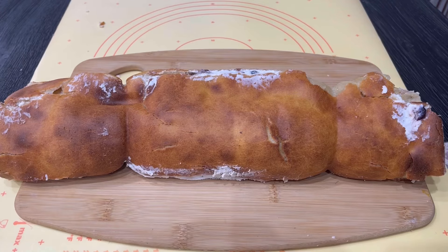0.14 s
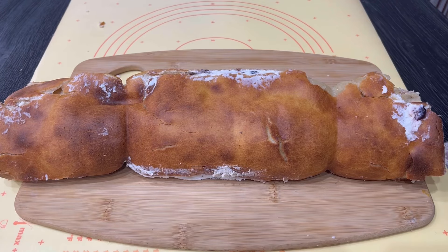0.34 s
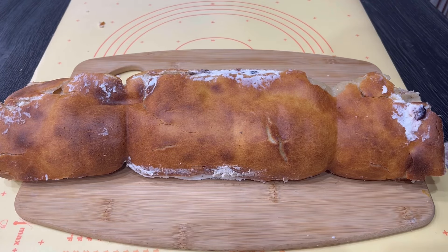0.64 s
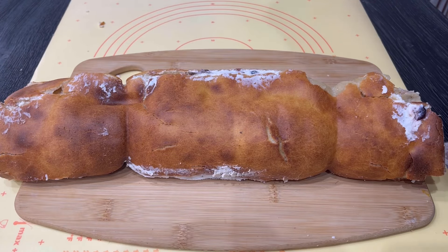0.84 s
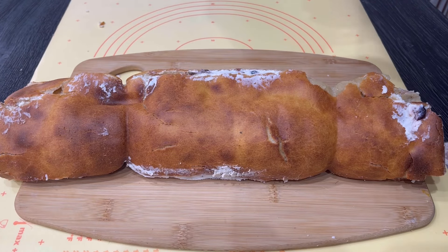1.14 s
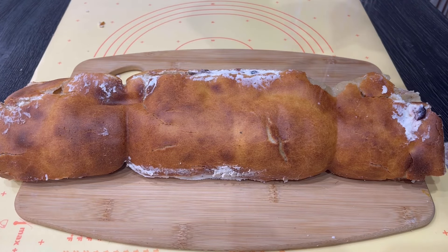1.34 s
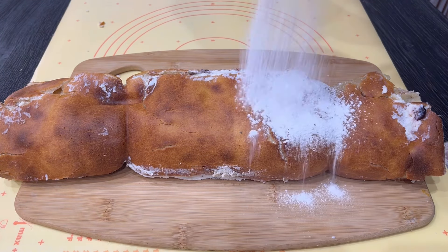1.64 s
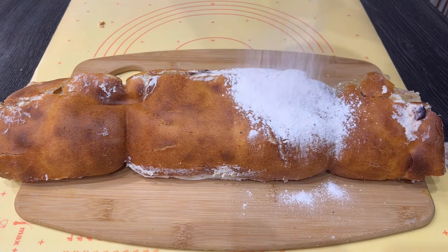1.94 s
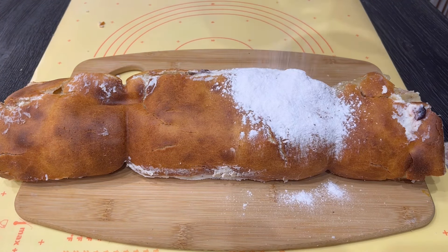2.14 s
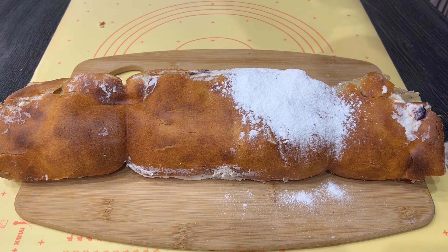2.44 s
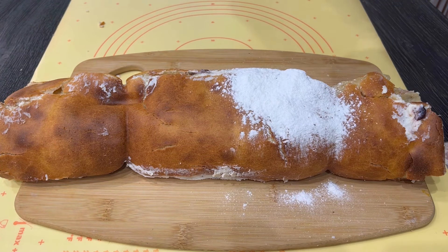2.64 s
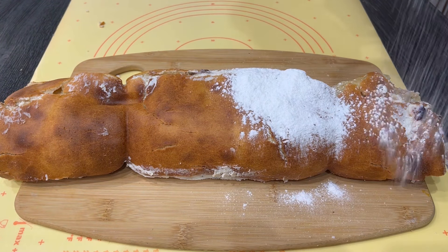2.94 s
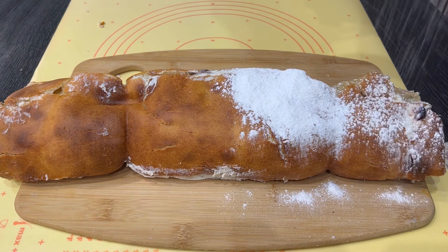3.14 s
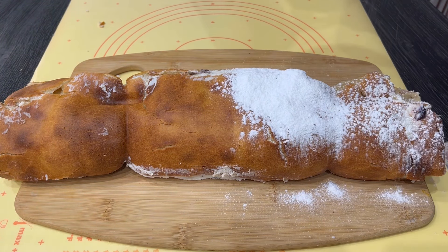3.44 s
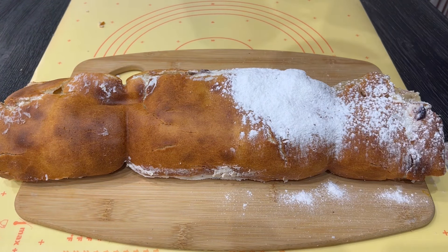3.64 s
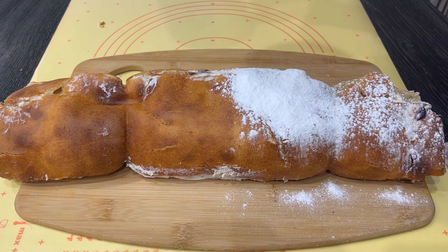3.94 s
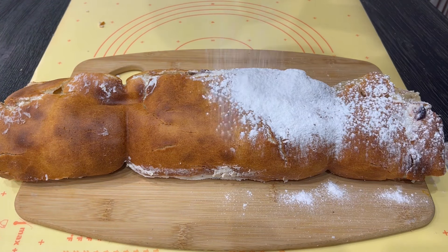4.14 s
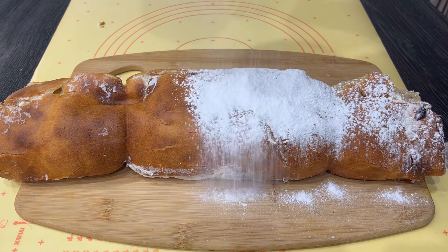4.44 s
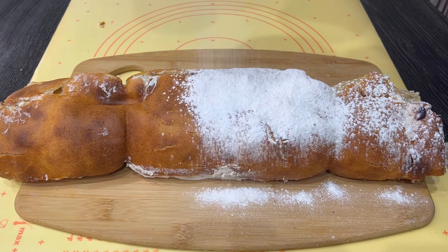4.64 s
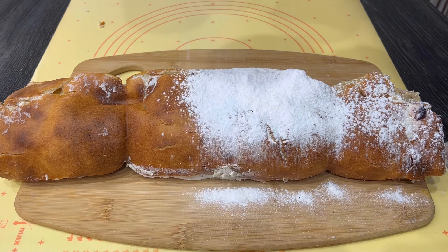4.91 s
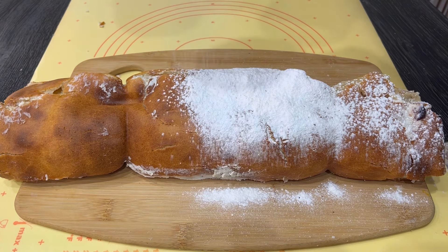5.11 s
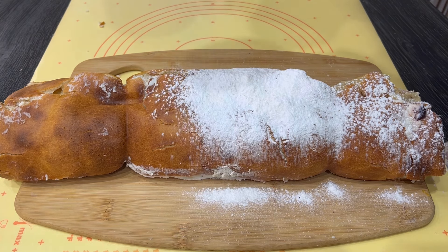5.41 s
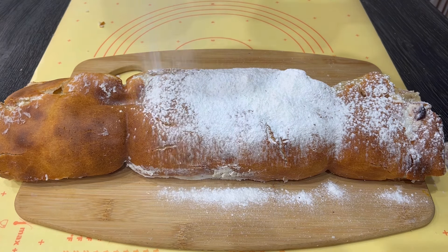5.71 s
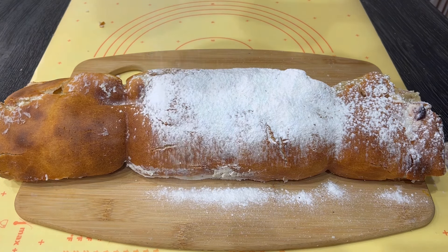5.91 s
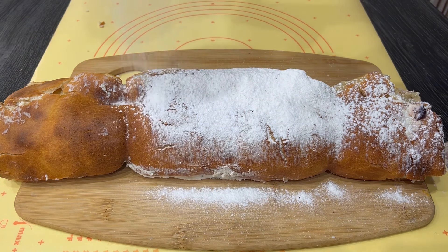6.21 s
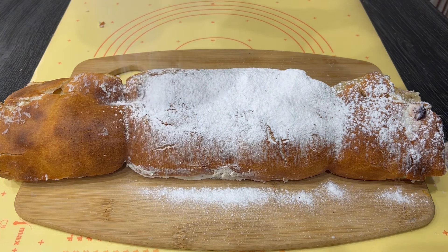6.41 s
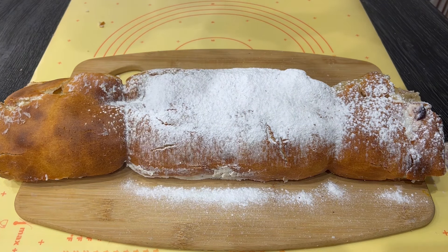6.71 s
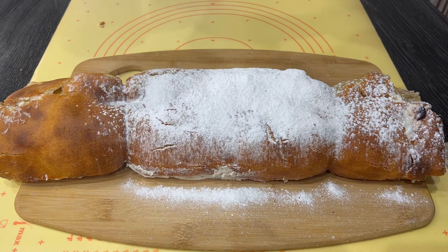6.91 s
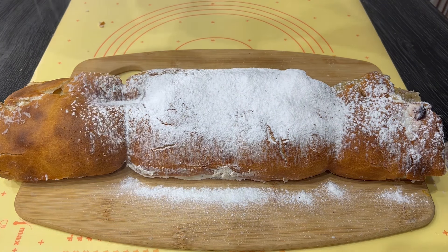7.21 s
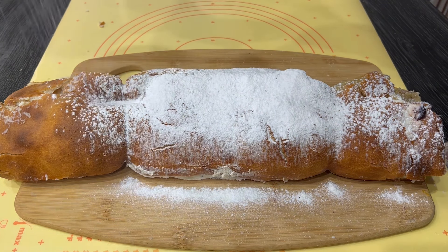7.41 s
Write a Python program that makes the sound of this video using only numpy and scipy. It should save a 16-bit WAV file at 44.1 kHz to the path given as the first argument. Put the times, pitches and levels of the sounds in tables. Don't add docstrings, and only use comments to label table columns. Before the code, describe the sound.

Close stereo microphone in a quiet kitchen with a faint fridge drone. A hand brushes the table and a thin metal sifter ticks faintly. Loose bright taps follow in two small bursts, then a pause. Hard, uneven shaking rattles the can with gritty sugar scrapes, growing strongest around the middle, then lighter, ticking shakes continue to the end.

```python
import sys
import numpy as np
from scipy import signal
from scipy.fft import rfft, irfft, next_fast_len
from scipy.io import wavfile
from scipy.ndimage import uniform_filter1d, map_coordinates

SR = 44100
rng = np.random.default_rng(int(sys.argv[2]) if len(sys.argv) > 2 else 0)


def level_to_linear(level):
    exponent = np.asarray(level, float) / 20
    return 10 ** exponent


def master(y):
    cut = np.clip(np.atleast_2d(y).T, -1, 1)
    pcm = np.round(cut * 32767)
    wavfile.write(sys.argv[1], SR, pcm.astype(np.int16))


N = 333396

# [t/s, push level/dB]
TRICKLE = [
    (6.4, -80),
    (6.6, -78),
    (7.56, -75.5),
]
# [t/s, level over the bare mesh/dB]
HEAP = [
    (1.1, 0),
    (3.6, -3.5),
    (7.5, -15.5),
]
# [f/Hz, width/Hz, level/dB]
LOADED_MESH = [(3620, 300, -3), (3850, 200, 0), (4300, 350, -1)]


def sifter():
    ring, chatter = knocks()
    groups = lambda parts: np.array([sum(parts[:2]), parts[2], sum(parts[3:])])
    trickle = level_to_linear(curves([TRICKLE], [-120]))
    grit = grind(strokes() + chatter + trickle)
    scraped = groups([rings(x, modes) for x, modes in zip(grit, PARTS)])
    heap_db = np.interp(np.arange(N) / SR, *np.transpose(HEAP))
    scraped[1] += level_to_linear(heap_db) * rings(grit[2], LOADED_MESH)
    return groups(ring + notes()) + shifting(scraped, patchy_db=2.6)


# [f/Hz, width/Hz, level/dB]
CUP = [(659, 250, 1), (799, 170, 9.5), (957, 380, -1), (348, 100, -12.5)]
WALL = [(1170, 380, -9.5), (1705, 500, -1), (1944, 393, -4.5), (2170, 121, -17), (2192, 475, -5),
        (3234, 570, -4)]
MESH = [(3800, 450, -12), (4350, 380, -7), (4680, 320, -.5), (5096, 320, -1), (5350, 480, -2)]
RIM = [(6330, 800, -3), (7310, 640, -3), (7815, 450, 1.5), (8606, 190, -4.5), (8930, 315, 4.5),
       (9140, 1700, -3)]
WIRE = [(10240, 240, -8.5), (11100, 210, -11), (11575, 470, -12), (11930, 520, -10), (13430, 720, -7),
        (15020, 240, -3.5)]
PARTS = CUP, WALL, MESH, RIM, WIRE
BLOW_DB = [-2, 0, -1, 2.5, 5]
# [t/s, level over the wall/dB]
GRIP = [(1.3, -13.5), (1.6, -50), (1.68, -10), (1.85, -6), (2.7, -6), (3.9, -11), (4.1, -1), (4.3, -16),
        (4.5, -11.5), (6.3, -4.5), (6.6, -6), (7.1, -3)]


def knocks():
    t = np.arange(SR // 24) / SR
    ring, chatter = np.zeros((2, 5, N + SR))
    chatter_db = np.array([[-12], [-16], [-14], [-21], [-21]])
    fade = (1 - np.exp(-t / 0.0002)) * level_to_linear(chatter_db - 60 * t / 0.05)
    dampings = (1.0, 0.76, 0.59, 1.05, 0.57)
    for s, *parts_db in blows():
        chance = rng.standard_normal((5, 3, 8))
        start = round((s - 0.0009) * SR)
        at = slice(start, start + len(t))
        cup_db = parts_db[0] + np.interp(s, *np.transpose(GRIP)) - 4.5
        gains = level_to_linear(np.array([cup_db, *parts_db])[:, None])
        hits = [struck(modes, t, luck, damping) for modes, luck, damping in zip(PARTS, chance, dampings)]
        ring[:, at] += gains * level_to_linear(np.c_[BLOW_DB]) * hits
        chatter[:, at] += gains * fade
    return ring[:, :N], chatter[:, :N]


# [t/s, peak level of rim/dB, wall/dB, wire/dB]
TAPS = [(1.1342, -42, -57, -62), (1.1394, -53, -68, -73), (1.1585, -44, -53, -60),
        (1.1925, -27.5, -34, -39), (1.2129, -35, -31.5, -36), (1.2727, -46, -54, -48),
        (1.3452, -64, -71, -101), (1.3799, -43, -42, -47), (1.3995, -29.5, -29, -34),
        (1.626, -57, -53, -71.5), (1.6819, -32.5, -33.5, -34), (1.7229, -26.5, -32.5, -24.5),
        (1.7933, -38, -48, -47), (1.8187, -20, -21.5, -33), (1.8536, -23.5, -36, -25)]
# [t/s, peak level of rim/dB, wall/dB, wire/dB]
SLAMS = [(2.6579, -42, -44.5, -77), (2.6833, -39, -41, -50), (2.7619, -28.5, -50, -40),
         (2.8012, -36, -38.5, -82), (2.8116, -29.5, -34.5, -45), (2.9217, -47, -38.5, -60),
         (3.0462, -33.5, -35, -57), (3.1509, -70, -41, -63), (3.2236, -39.5, -63, -56),
         (3.2805, -21.5, -40, -34), (3.4407, -34, -52, -40), (3.4908, -18.5, -31, -23),
         (3.6065, -38.5, -40, -69), (3.7237, -17, -31.5, -24), (3.7306, -43, -34, -38),
         (3.9737, -19, -35.5, -36), (3.979, -18.5, -24.5, -23.5), (4.0942, -22, -36.5, -35),
         (4.1068, -27, -33, -27), (4.1195, -29, -33.5, -30), (4.1374, -32, -31, -32),
         (4.2231, -15, -29, -27), (4.2454, -52, -45, -30), (4.3356, -35, -43, -31),
         (4.4743, -35.5, -35.5, -52), (4.4812, -53, -48, -44), (4.6127, -36.5, -38.5, -46),
         (4.7434, -26.5, -37, -21), (4.8055, -27, -34, -40), (4.9321, -20.5, -35, -13.5)]
# [t/s, peak level of rim/dB, wall/dB]
TOUCHES = [(5.1226, -42, -36), (5.1778, -50, -39.5), (5.2248, -30, -35.5), (5.3621, -30, -34),
           (5.4328, -37, -39), (5.506, -39, -62), (5.613, -32, -38.5), (5.7918, -42, -36),
           (5.8, -23.5, -34), (5.8928, -38.5, -41.5), (5.912, -32, -38), (6.0405, -34, -42),
           (6.045, -42, -55), (6.112, -27, -32.5), (6.1952, -33, -68), (6.2395, -37, -34.5),
           (6.469, -38, -34), (6.5538, -46, -43), (6.567, -41, -45), (6.6862, -24, -29.5),
           (6.754, -48, -46), (6.7644, -41.5, -40.5), (6.905, -72, -40), (6.9854, -34, -35.5),
           (7.0376, -43.5, -44), (7.0964, -32, -30), (7.1767, -40, -43), (7.29, -26.5, -29.5),
           (7.395, -36.5, -39.5)]
# [t/s, peak level of mesh/dB, rim and wire/dB]
CATCHES = [(3.0016, -53, -33), (3.349, -49, -48), (3.4353, -37, -39.5), (3.554, -38, -47),
           (3.5606, -51, -46), (3.6805, -40, -31.5), (3.9408, -38.5, -48), (3.945, -31, -38),
           (4.18, -40, -49), (4.219, -33.5, -30), (4.4383, -49, -37), (4.4473, -32.5, -39.5),
           (4.6792, -34, -45), (4.6864, -37.5, -40), (4.696, -30.5, -40), (4.887, -31, -34.5),
           (4.8917, -33, -32), (4.9754, -33, -42)]
# [t/s, peak level of mesh/dB, rim and wire/dB]
SNAGS = [(5.075, -34, -38), (5.0842, -35, -35.5), (5.3193, -36, -40), (5.571, -47, -45),
         (5.641, -40.5, -50), (5.851, -37, -46.5), (5.986, -45, -40), (5.993, -40, -49), (6.187, -46, -37),
         (6.379, -44, -64), (6.508, -38, -49), (6.6337, -33.5, -44), (6.671, -32, -46), (6.828, -38, -43),
         (7.0881, -38, -60), (7.126, -34, -41), (7.241, -41, -44), (7.342, -36.5, -55), (7.488, -41, -47),
         (7.498, -40.5, -64)]
# [t/s, peak level of mesh/dB, rim and wire/dB]
GRAZES = [(1.228, -54, -33.5), (1.814, -50, -32.5), (2.967, -52, -69), (3.212, -54, -52), (4.128, -42, -34),
          (5.735, -42.5, -61), (6.175, -45, -48), (7.267, -37, -60), (7.53, -47, -61)]
# [t/s, peak level of wall/dB, mesh/dB, rim/dB, wire/dB]
LIFT = (0.1405, -52, -45, -56, -58)


def blows():
    slam = [(s, wall, -46.5 + 0.26 * (wire + 45), rim, wire) for s, rim, wall, wire in TAPS + SLAMS]
    touch = [(s, wall, wall - 4.5, rim, rim - 6.5) for s, rim, wall in TOUCHES]
    catch = lambda rows: [(s, mesh - 15, mesh, top + 5, top + 3.5) for s, mesh, top in rows]
    return sorted(slam + touch + catch(CATCHES + SNAGS)) + [LIFT] + catch(GRAZES)


def struck(modes, t, chance, damping):
    hz, width, db = np.transpose(modes)[:, :, None]
    size, shift, phase = chance[:, :len(modes), None]
    size_db = db + 2.8 * size - 10 * (hz > 14500)
    since = np.maximum(t - 0.0008 * abs(phase), 0)
    pitch = hz * (1 + 0.012 * shift)
    wave = level_to_linear(size_db) * np.exp(2j * np.pi * (pitch * t + phase) - np.pi * width * damping * since)
    rise_s = 0.00051 + 0.38 / hz
    wave = (wave * np.sin(np.pi / 2 * np.minimum(since / rise_s, 1)) ** 2).sum(0)
    return wave.real / abs(wave).max()


# [t/s, peak level/dB, f/Hz]
CUP_NOTES = [(0.136, -40, 620), (1.138, -44.5, 918), (1.274, -38, 810), (1.399, -29, 890),
             (1.426, -41, 910), (1.695, -34.5, 880), (1.721, -27.5, 830), (1.817, -33, 855),
             (1.844, -38, 770), (1.869, -42, 740), (2.682, -41.5, 860), (2.956, -46, 1130),
             (3.49, -41, 1020), (3.731, -37.5, 930), (3.834, -44.5, 1154), (3.974, -35, 1160),
             (4.094, -36, 900), (4.119, -41, 770), (4.136, -33, 884), (4.222, -52, 830), (4.316, -43, 850),
             (5.433, -45, 830), (6.113, -43, 1027), (6.669, -44, 740), (6.685, -48, 820), (6.755, -38, 970),
             (7.041, -40, 744), (7.084, -41, 744), (7.093, -40, 1005), (7.29, -36.5, 770),
             (7.547, -45, 1030)]
WALL_NOTES = [(1.1338, -41, 2260), (1.193, -39, 1570), (1.2127, -37, 1810), (1.378, -42.5, 2920),
              (1.3992, -24, 2050), (1.667, -52, 2930), (1.68, -32, 1730), (1.7224, -24.5, 1614),
              (1.8179, -25.5, 1830), (2.659, -42, 2600), (2.6842, -33, 2260), (2.7623, -37.5, 2900),
              (2.7995, -34, 2230), (2.9202, -36, 3080), (3.002, -42, 3050), (3.0453, -50, 1950),
              (3.151, -39.5, 3050), (3.2799, -38, 2530), (3.44, -35.5, 2580), (3.4919, -34, 3220),
              (3.606, -37.5, 1650), (3.6808, -38, 2490), (3.9739, -28.5, 1660), (4.095, -33.5, 1600),
              (4.1393, -37, 1780), (4.2214, -26.5, 1530), (4.4376, -40.5, 2180), (4.4724, -34, 1680),
              (4.687, -41, 3150), (4.7274, -38, 1680), (4.743, -30, 2290), (4.8057, -41, 1860),
              (4.8886, -40, 3140), (4.933, -29, 2350), (5.123, -41, 1590), (5.178, -41, 3320),
              (5.224, -36, 1690), (5.362, -34, 1700), (5.611, -42, 1990), (5.64, -40, 2300),
              (5.8008, -45, 1940), (5.8917, -44, 1740), (5.9105, -41, 2280), (6.0389, -31.5, 1820),
              (6.1148, -33, 1770), (6.2386, -36, 1670), (6.4706, -43, 1940), (6.508, -41, 3180),
              (6.6687, -45, 2080), (6.6867, -46, 1570), (6.753, -40, 1810), (6.904, -39, 1810),
              (7.0946, -36.5, 1830), (7.24, -46, 2960), (7.2919, -33.5, 1810)]
MESH_NOTES = [(1.1921, -45, 6960), (1.3977, -37, 3840), (1.8167, -37, 3850), (2.6594, -41, 5430),
              (2.9202, -40, 3580), (3.002, -33, 5300), (3.2814, -33, 4960), (3.436, -42, 4240),
              (3.4914, -35, 6340), (3.677, -30, 4740), (3.9449, -31, 5050), (3.9743, -31, 6250),
              (4.096, -34, 4900), (4.205, -40, 5270), (4.439, -28, 4610), (4.6877, -45, 4580),
              (4.745, -26, 5280), (4.8049, -36, 6140), (4.8828, -28, 4800), (4.9335, -24, 5300),
              (5.0735, -39, 4740), (5.224, -34, 6400), (5.3195, -35, 5210), (5.362, -28.5, 6330),
              (5.6125, -28.5, 6400), (5.9857, -35, 4570), (6.1116, -35, 4570), (6.1868, -29.5, 4700),
              (6.3764, -48, 4700), (6.47, -33.5, 6330), (6.5547, -48, 4670), (6.7545, -37, 6460),
              (6.8278, -46, 5230), (6.9845, -39, 6750), (7.0372, -37, 5370), (7.0947, -26.5, 6530),
              (7.1246, -28, 5630), (7.2374, -30.5, 5120), (7.2903, -23, 6450), (7.3411, -34, 5230),
              (7.4894, -28, 5280)]
# [rise/s], [t60/s], [level/dB]
NOTE_RISE_S = (0.0016, 0.00079, 0.00015)
NOTE_T60_S = (0.038, 0.015, 0.022)
NOTE_DB = (-2.5, 1.5, -2.5)


def notes():
    out = np.zeros((5, N + SR))
    t = np.arange(SR // 12) / SR
    for k, rows in enumerate((CUP_NOTES, WALL_NOTES, MESH_NOTES)):
        rise = np.sin(np.pi / 2 * np.minimum(t / NOTE_RISE_S[k], 1)) ** 2
        shape = rise * level_to_linear(NOTE_DB[k] - 60 * t / NOTE_T60_S[k])
        for s, db, hz in rows:
            out[k, round(s * SR):][:len(t)] += level_to_linear(db) * shape * np.sin(2 * np.pi * hz * t)
    return out[:, :N]


# [t/s, length/s, push level on wall/dB, on mesh/dB]
STROKES = [(0.096, 0.044, -65, -67), (0.67, 0.072, -75, -72.5), (1.118, 0.054, -59.5, -73.5),
           (1.194, 0.075, -51.5, -58.5), (1.387, 0.042, -45.5, -53), (1.656, 0.066, -48, -57),
           (1.802, 0.046, -51, -49), (2.666, 0.022, -51, -51.5), (2.784, 0.023, -53, -50),
           (2.909, 0.047, -63.5, -69.5), (2.992, 0.059, -60, -61), (3.134, 0.013, -61, -57.5),
           (3.202, 0.034, -58.5, -56.5), (3.271, 0.015, -52, -50.5), (3.336, 0.0096, -47.5, -49.5),
           (3.43, 0.043, -59.5, -49.5), (3.48, 0.011, -58, -47), (3.542, 0.013, -51, -53),
           (3.674, 0.014, -50, -41), (3.715, 0.047, -84, -59.5), (3.773, 0.094, -57, -61),
           (3.952, 0.032, -47.5, -44.5), (4.084, 0.045, -52, -54), (4.203, 0.021, -41, -45),
           (4.293, 0.051, -57.5, -70), (4.419, 0.055, -59, -50.5), (4.565, 0.014, -53, -56),
           (4.686, 0.033, -55.5, -54), (4.722, 0.04, -51.5, -43.5), (4.877, 0.0053, -50, -30)]
# [t/s, length/s, push level on wall/dB, on mesh/dB]
SWINGS = [(4.908, 0.065, -54, -48.5), (5.066, 0.12, -59.5, -58), (5.215, 0.046, -60, -60.5),
          (5.333, 0.054, -52, -48.5), (5.477, 0.0077, -53, -63), (5.535, 0.096, -59.5, -52),
          (5.767, 0.059, -53.5, -49.5), (5.884, 0.029, -63.5, -68), (5.973, 0.04, -63.5, -52),
          (6.018, 0.033, -55, -52), (6.089, 0.011, -54, -62), (6.166, 0.071, -56, -50),
          (6.421, 0.083, -74, -59), (6.534, 0.025, -65.5, -76), (6.646, 0.025, -51, -45),
          (6.747, 0.014, -57, -66), (6.819, 0.083, -99, -60), (6.856, 0.024, -58.5, -56),
          (6.943, 0.038, -63, -70), (7.058, 0.025, -52.5, -43), (7.231, 0.0091, -61, -40),
          (7.268, 0.021, -47.5, -44), (7.357, 0.028, -58.5, -66.5), (7.485, 0.047, -61.5, -50.5)]


def strokes():
    push = np.zeros((5, N + SR))
    t = np.arange(SR // 4) / SR
    slide = (1 - np.exp(-t / 0.006)) ** 2
    for s, length, wall, mesh in STROKES + SWINGS:
        shape = slide * level_to_linear(-3 * t / length - 138 * np.maximum(t - length, 0))
        cup = wall + np.interp(s, *np.transpose(GRIP)) + 0.98 * (wall - mesh)
        rim = wall + 0.35 * (mesh - wall) + 4.5
        wire = rim - 1.5
        parts_db = np.array([cup, wall, mesh, rim, wire])[:, None]
        push[:, round(s * SR):][:, :len(t)] += level_to_linear(parts_db) * shape
    return push[:, :N]


def grind(push):
    crushed = rng.random(N) < 1400 / SR
    crystals = crushed * level_to_linear(2.8 * np.minimum(rng.exponential(size=N), 4))
    grit = unit(crystals) * 0.55 + 1
    clumps = level_to_linear(1.5 * wobble(60) + 2.5 * wobble(220))
    own = level_to_linear(2.2 * np.array([wobble(110) for _ in PARTS]))
    return push * unit(grit * clumps * own) * rng.standard_normal(push.shape)


def shifting(x, patchy_db):
    z = signal.stft(x, nperseg=256)[2]
    field = uniform_filter1d(rng.standard_normal(z.shape), size=2, axis=1)
    field = unit(uniform_filter1d(field, size=9, axis=2))
    patches = level_to_linear(patchy_db * field - 0.22 * patchy_db ** 2)
    return signal.istft(z * patches, nperseg=256)[1][:, :N]


# [t/s, thud level/dB, swish level/dB]
HAND = [
    [(0, -81, -71), (.1, -66, -66.5), (.14, -56.5, -51), (.175, -74, -55), (.25, -61, -53), (.33, -58, -67),
     (.44, -65, -87)],
    [(.44, -71, -97), (.49, -64, -62), (.62, -61, -71.5), (.73, -63, -62), (.92, -65, -72.5),
     (.96, -56.5, -59.5), (1.12, -77, -67.5)],
    [(1.12, -67.5, -78), (1.4, -69.5, -94), (1.8, -71.5, -90), (2.05, -77, -100)],
    [(2.66, -69.5, -92), (3.5, -73.5, -83), (4.2, -74.5, -80), (5, -69, -71), (5.8, -73.5, -88),
     (6.3, -75, -73), (6.6, -62, -70), (6.85, -60, -64), (7.56, -60.5, -69)],
]
# [f/Hz, level per Hz/dB]
THUD = [(24, -34.5), (40, -7), (195, -1), (329, -1.5), (395, -7.5), (600, -15.5), (780, -36), (1320, -120)]
SWISH = [(240, -38.5), (400, -6), (626, -5), (839, -8), (2300, -18.5), (5350, -29.5), (5960, -38),
         (7510, -31), (16000, -58)]


def hand():
    thud_db, swish_db = curves(HAND, [-120, -120])
    thud_db += 1.8 * wobble(25)
    swish_db += 2 * wobble(70)
    thud = level_to_linear(thud_db) * rush(THUD, [(100, 0.97), (600, 0.76)])
    swish = level_to_linear(swish_db) * rush(SWISH, [(500, 0.072), (8000, 0.35)])
    return thud + swish


# [f/Hz, t60/s]
KITCHEN = [(300, 0.44), (2000, 0.26), (9000, 0.13), (16000, 0.037)]


def kitchen(x):
    step = SR // 10
    pieces = np.pad(x, (90, -(N + 90) % step)).reshape(-1, 1, step)
    hz, t, z = signal.stft(rng.standard_normal((len(pieces), 2, SR // 3)), SR, nperseg=256)
    decay = level_to_linear(-60 * t / along(KITCHEN, hz)[:, None])
    tail = signal.istft(z * decay, SR, nperseg=256)[1]
    tail = tail / np.linalg.norm(tail[0, 0])
    out = np.zeros((2, N + SR))
    for k, wash in enumerate(signal.fftconvolve(pieces, tail, axes=2)):
        out[:, k * step:][:, :wash.shape[1]] += wash
    return out[:, :N]


# [f/Hz, level per Hz/dB]
AIR = [(24, -7), (40, -14), (70, -15.5), (172, -18.5), (231, -11), (255, -28.5), (325, -21), (820, -33),
       (1970, -20), (3210, -25.5), (3540, -20), (4150, -25.5), (4600, -23), (12000, -42.5), (13500, -36),
       (15000, -58)]
# [f/Hz, likeness]
ALIKE = [(60, 0.92), (180, 1), (550, 0.39), (1650, 0.019), (5000, 0.31), (8000, 0.31)]
# [f/Hz, width/Hz, level/dB]
HUM = [(64.7, 3.1, 9), (192.6, 6.6, 2.5), (225, 11, 0.5), (326.6, 23, 0.5), (3800, 30, -9)]


def room_tone():
    drift_db = 0.7 * wobble(3)
    air = level_to_linear(-66 + drift_db) * rush(AIR, ALIKE)
    fridge = level_to_linear(-75) * rings(rng.standard_normal(N), HUM)
    return air + fridge


def unit(x):
    return x / np.sqrt(np.mean(x ** 2) + 1e-20)


def along(points, hz):
    f, v = np.transpose(points)
    return np.interp(np.log(hz + 1), np.log(f + 1), v)


def curves(spans, silent):
    out = np.tile(np.reshape(silent, (-1, 1)), N) * 1.0
    for rows in spans:
        s, *cols = np.transpose(rows)
        k = np.arange(max(round(s[0] * SR), 0), min(round(s[-1] * SR), N))
        out[:, k] = [np.interp(k / SR, s, c) for c in cols]
    return out


def wobble(rate):
    knots = rng.standard_normal(int(N * rate / SR) + 4)
    return map_coordinates(knots, [np.arange(N) * rate / SR])


def filtered(x, response):
    m = next_fast_len(N + SR // 2)
    return irfft(rfft(x, m) * response(np.fft.rfftfreq(m, 1 / SR)), m)[..., :N]


def rings(x, modes):
    def gain(f):
        total = 0
        for k, (c, w, db) in enumerate(modes):
            total = total + (-1) ** k * level_to_linear(db / 2) * 1j * f * w / (c * c - f * f + 1j * f * w)
        return total ** 2
    power = np.mean(abs(gain(np.linspace(0, SR / 2, 4096))) ** 2)
    return filtered(x, gain) / np.sqrt(power)


def pair(x, alike):
    turn = lambda hz: np.arccos(np.clip(along(alike, hz), -1, 1)) / 2
    mid, side = filtered(x, lambda hz: np.array([np.cos(turn(hz)), np.sin(turn(hz))]))
    return np.array([mid + side, mid - side])


def rush(spectrum, alike):
    noise = filtered(rng.standard_normal((2, N)), lambda hz: level_to_linear(along(spectrum, hz)))
    return unit(pair(noise, alike))


SIDES = np.array([[0.5], [-0.5]])
# [t/s, left minus right level/dB]
PLACE = [
    (1.1, 7.5),
    (3.8, 8.5),
    (5.5, 12.5),
    (7.56, 15),
]
LEAN_DB = [-7, -6]
# [f/Hz, likeness]
DIFFUSE = [(600, 0.25), (6000, 0.031), (8000, 0.32)]


def scene():
    body, mesh, treble = sifter()
    pan_db = np.interp(np.arange(N) / SR, *np.transpose(PLACE))
    body_pan = level_to_linear(SIDES * (pan_db + LEAN_DB[0]))
    mesh_pan = level_to_linear(SIDES * (pan_db + LEAN_DB[1]))
    direct = treble + body * body_pan + mesh * mesh_pan
    wash = level_to_linear(-7.5) * pair(kitchen(body + mesh + treble), DIFFUSE)
    return direct + wash + hand() + room_tone()


def low_pass(x):
    return signal.sosfilt(signal.butter(12, 17140, fs=SR, output="sos"), x)


# [f/Hz, phase/rad]
PORTS = [(0, 0), (700, -.6), (1400, .3), (3400, -.7), (4650, .2), (5500, -.5), (7600, -.65), (8270, 0),
         (8950, 1), (10150, 3.14), (12050, 6.28), (12600, 6.8), (13300, 8.9), (14200, 9.6), (15100, 12.2)]
# [f/Hz, level/dB]
CASE = [(30, -37), (40, 0), (5500, -3.5), (5900, -5), (12300, -3.5), (13000, -3.5), (15300, -12),
        (15750, 2), (15950, -31), (17000, -59.5)]


def record(dry):
    def ports(hz):
        lead = np.interp(hz, *np.transpose(PORTS))
        return np.exp(-1j * SIDES * lead) * level_to_linear(along(CASE, hz))
    return low_pass(filtered(dry, ports))


dry = scene()
out = record(dry)
master(out)
```